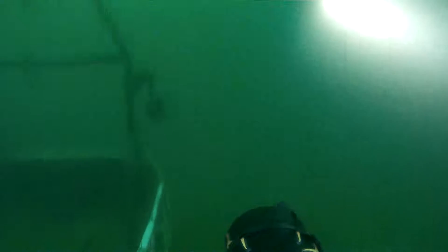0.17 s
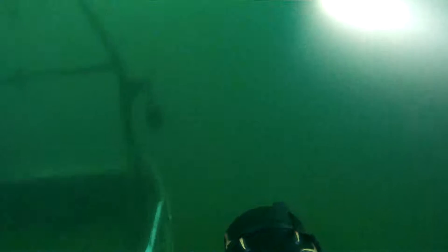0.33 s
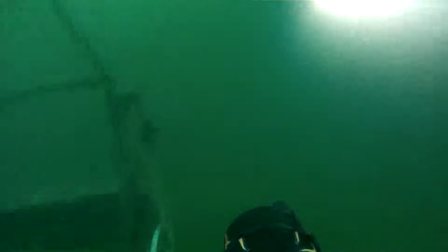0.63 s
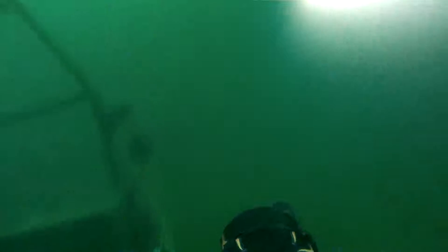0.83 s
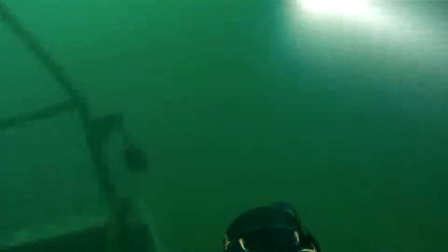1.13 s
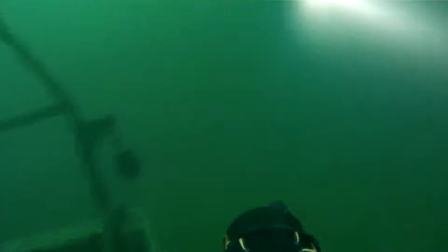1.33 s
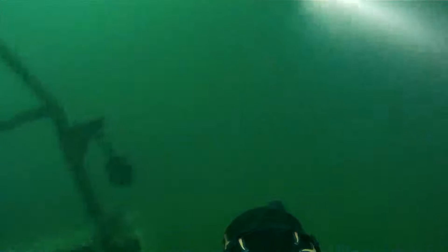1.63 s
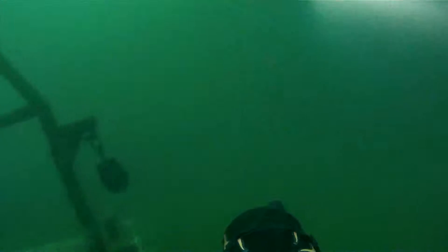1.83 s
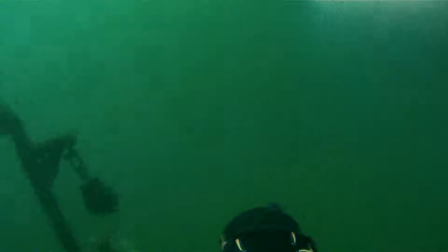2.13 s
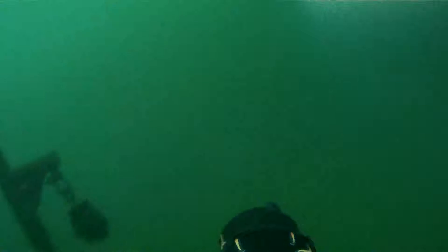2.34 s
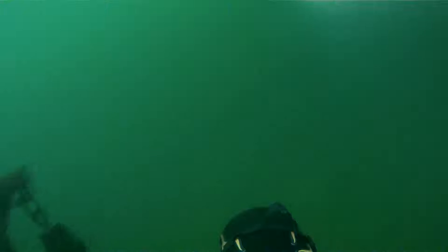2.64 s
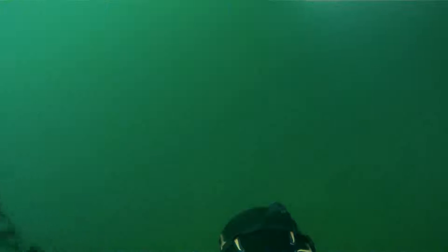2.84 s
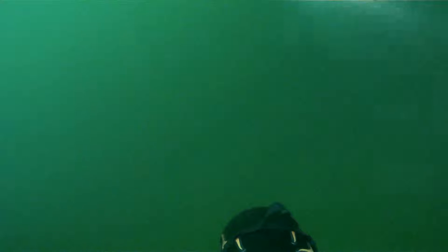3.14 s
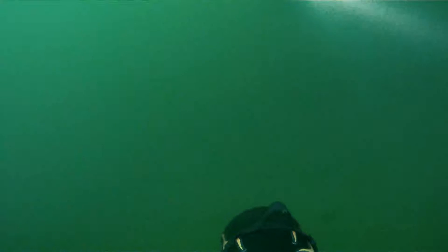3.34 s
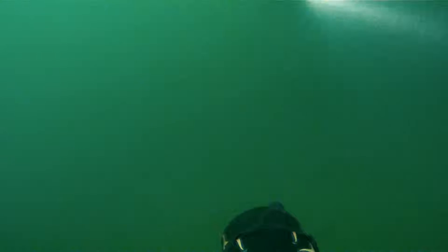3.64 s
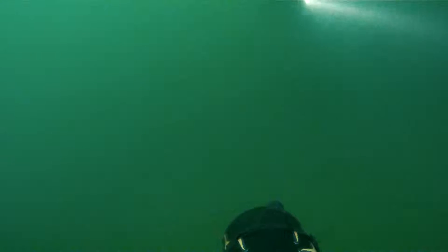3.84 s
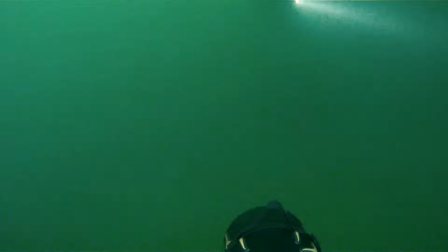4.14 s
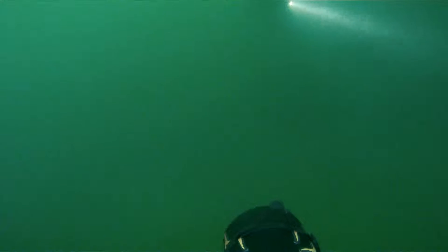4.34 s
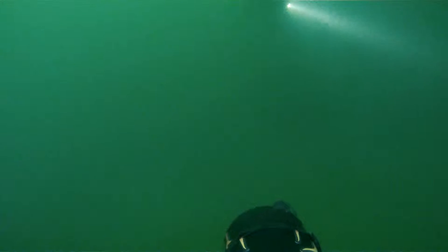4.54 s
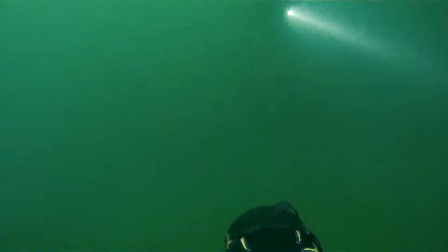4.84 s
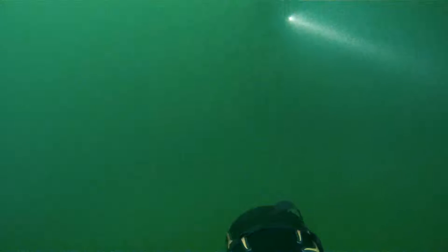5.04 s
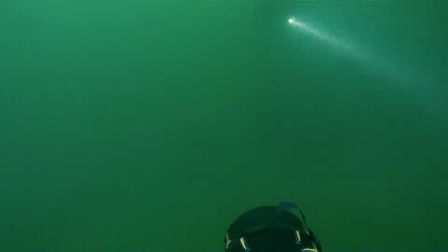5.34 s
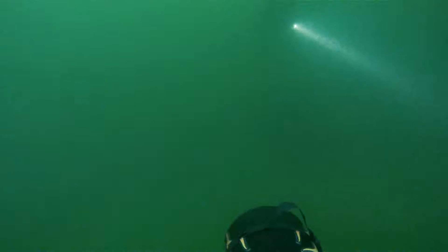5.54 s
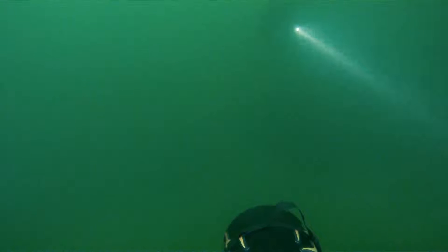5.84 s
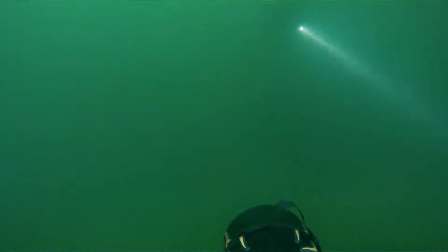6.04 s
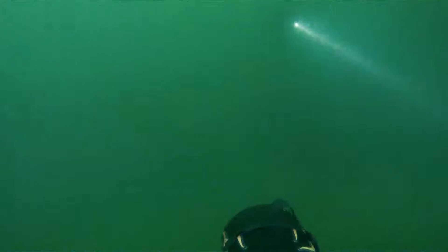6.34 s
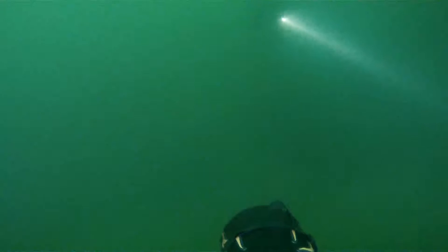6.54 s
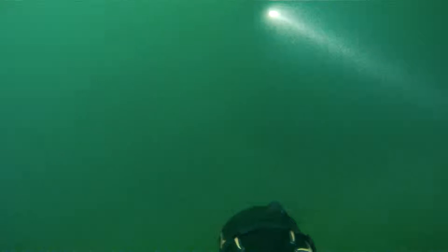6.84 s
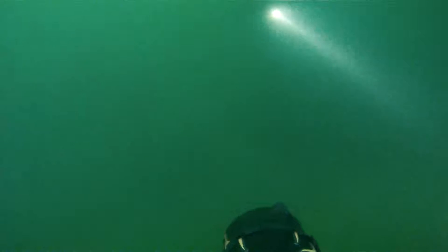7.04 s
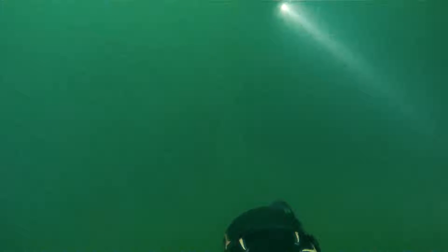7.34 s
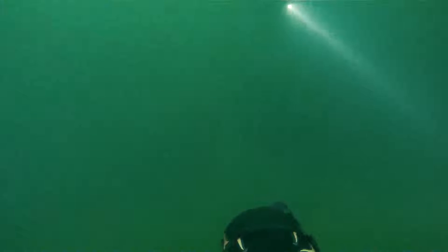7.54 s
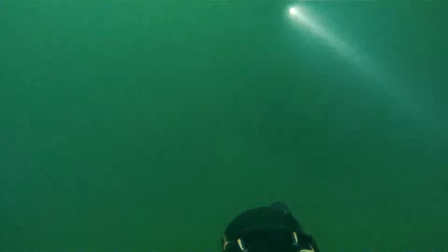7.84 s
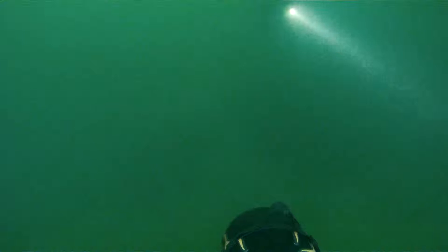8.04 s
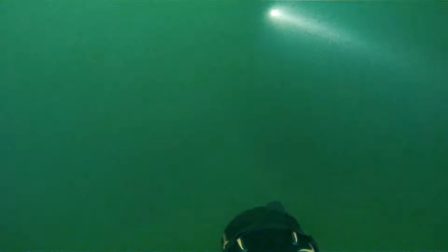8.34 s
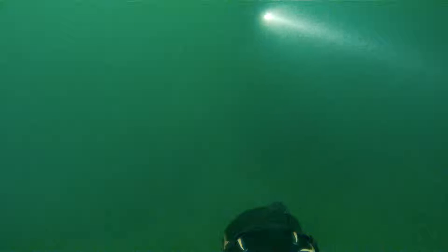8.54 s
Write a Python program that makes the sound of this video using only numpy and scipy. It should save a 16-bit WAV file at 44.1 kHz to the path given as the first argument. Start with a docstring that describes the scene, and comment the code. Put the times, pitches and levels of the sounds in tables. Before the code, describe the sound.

Heard from inside a camera housing underwater, an electric scooter hums at nearly constant speed, its low drone wavering between two close pitches. A thin steady gear whine sits on top, fading in the middle and returning. Turbulent wash rumbles with irregular soft bumps and brief gurgles. A sharp tick comes near two seconds and a hard knock near seven. The sound is close, muffled and slightly gritty.

```python
"""Under water, in a camera housing: an electric scooter tows a diver at nearly steady speed.
The propeller hums as shaft harmonics; the gearbox whines as a mesh tone with overtones and sidebands.
Filtered noise makes the wash and blade hiss; dying rings make eddies, bumps, gurgles, ticks and a knock.
The camera's limiter ticks as it steps its gain; a slow converter mirrors all into a thin treble fizz."""
import sys
import numpy as np
from scipy import signal
from scipy.fft import rfft, irfft, next_fast_len
from scipy.io import wavfile
from scipy.ndimage import minimum_filter1d

SR = 44100
rng = np.random.default_rng(int(sys.argv[2]) if len(sys.argv) > 2 else 0)


def unload_wav(signal):
    """Save mono or channel-first audio to the path in sys.argv[1] as 16-bit WAV at rate SR, clipped to [-1, 1]."""
    wavfile.write(
        sys.argv[1],
        SR,
        np.round(np.clip(np.atleast_2d(signal).T, -1, 1) * 32767).astype(np.int16),
    )


N = 383229

SHAFT_HZ, MESH_HZ = 31.8, 1408.7
CONVERTER_HZ, HOLD_COPIES, TOP_CUT_HZ = 12000, 4, 15200

# Levels are before the gains of the source functions and the recorder.
# hum lines as multiples of the shaft rate: order
HUM_ORDERS = [1, 2, 3, 4, 5, 7, 8, 9, 10, 14, 16]
# hum lines, one row per order: level_db, unsteady_share [0-1]
HUM_LINES = [(-30.5, 0.1), (-39.5, .2), (-25.5, .1), (-28, .1), (-36, 0.2), (-36.5, 0), (-25, .6),
             (-32, 0.6), (-27.5, .25), (-55, 0.9), (-43, 0.5)]
# lean between the two drones, positive favours the lower: time_s, lean_db
DRONE_LEAN = [(0, 8), (0.7, 5.5), (1.05, -8.5), (1.6, -1), (2.1, 3), (3.4, -2.5), (3.9, 1), (5.1, -8.5),
              (5.7, -5), (6.2, 4.5), (6.75, 9), (7.1, -2.5), (7.6, 7), (7.9, 0), (8.69, 3)]
# share of the lean that raises the lower drone, share that lowers the upper one
LOWER_SHARE, UPPER_SHARE = 0.85, 0.48

# gear whine at the housing, sagging in mid-passage: time_s, level_db
MESH_LEVEL = [(0, -38), (1.7, -37.5), (2.1, -39.5), (3.1, -39.5), (3.62, -35.5), (3.71, -50), (3.8, -38.5),
              (3.88, -50), (4.25, -52.5), (4.6, -44.5), (5.0, -44.0), (5.35, -38), (7.4, -35), (8.69, -39)]
# sideband offsets from the mesh tone, the shaft rocking the gears: order [shaft rates]
SIDEBAND_ORDERS = [-12, -8, -4, 4, 12, 16, 24]
# sidebands, one per offset: level_db
SIDEBAND_LEVELS = [-50.5, -58, -57.5, -52.5, -62, -60, -76]
# lower sidebands, standing out while the mesh tone sags: time_s, gain_db
LOW_SIDEBAND_GAIN = [(3.4, -1.5), (4.0, 3), (5.3, 5), (5.9, 0.5)]
# motor tones, fixed pitches with fluttering levels: pitch_hz, level_db
MOTOR_TONES = [(55.5, -24.5), (87, -33), (1070, -53), (1464, -57)]
# deepest motor tone, strongest early on: time_s, gain_db
DEEP_TONE_GAIN = [(0, -3), (1.2, 4), (2.2, .5), (8.69, -2)]
# mesh swell, about once a second
SWELL_DB, SWELL_HZ, SWELL_PEAK_S = 1.1, 0.98, 0.40
# gear overtones and, by a share, blade hiss start weaker, then hold
OVERTONE_DB, START_DB, FULL_S, HISS_SHARE = -58.8, -2.5, 1.3, 0.35

# turbulent wash spectrum: frequency_hz, density_db [dB per Hz]
WASH_SPECTRUM = [(10, -80), (22, -59.5), (42, -40.5), (75, -38.5), (105, -34.5), (145, -40), (195, -48),
                 (300, -45.5), (345, -49.5), (400, -69.5), (600, -103.5)]
# hull and shroud resonances: frequency_hz, width_hz, density_db [dB per Hz]
HULL_MODES = [(165.5, 21, -38), (253.3, 20, -40), (277.6, 29, -37.5), (313.1, 10, -45), (506, 24, -54.5),
              (564.7, 22, -58.5), (743.6, 70, -63.5), (1035.4, 36, -64), (1452, 100, -65.5)]
# eddies bumping the housing: time_s, level_db
BUMPS = [(.025, 1), (0.471, -5), (0.629, -2.5), (.842, -7), (1.329, 0), (1.874, 1), (2.211, -3), (2.46, -4),
         (3.025, -0.5), (3.475, -2), (3.655, -2), (3.874, -3), (4.19, -4), (4.633, 2.5), (5.86, -6),
         (6.111, 0), (7.227, -5), (8.039, -2.5), (8.242, -1), (8.49, 0)]
# gurgles: time_s, middle_pitch_hz, first_bubble_db, length_s
GURGLES = [(.215, 760, -21, .03), (.818, 680, -22, .035), (1.475, 720, -28, .035), (2.372, 753, -27, .02),
           (3.193, 745, -36, .02), (3.625, 630, -25, .035), (3.785, 1280, -24.5, .04),
           (5.517, 730, -14, .014), (7.70, 715, -28, .02)]
# short ticks, one faint and ringing, one sharp and broadband: time_s, pitch_hz, level_db, t60_s
TICKS = [(1.108, 2320, -38, .022), (2.142, 1800, -3.5, .0011)]
# modes of one hard knock: delay_s, pitch_hz, level_db, t60_s
KNOCK_MODES = [(0, 3020, -18, .01), (.0008, 1300, -5.5, .012), (.002, 189, 11, .028),
               (.008, 2900, -27, .009)]
KNOCK_S = 6.980
# hiss shed by the blades: frequency_hz, density_db [dB per Hz]
HISS_SPECTRUM = [(250, -83.5), (430, -67), (580, -69.5), (650, -72.5), (800, -76.5), (940, -84.5),
                 (1100, -72), (1300, -79.5), (1900, -78.5), (2250, -90.5), (2700, -94), (3150, -89.5),
                 (3550, -104), (5500, -118)]


def from_db(db):
    """Decibels to amplitude gain."""
    return np.exp(np.log(10) / 20 * np.asarray(db))


def rms_one(x):
    """Scale to unit power."""
    return x / np.sqrt(np.mean(np.abs(x) ** 2) + 1e-20)


def in_time(rows):
    """Interpolate each column to one value per sample."""
    time_s, *columns = np.transpose(rows)
    return [np.interp(np.arange(N) / SR, time_s, column) for column in columns]


def drift(rate_hz):
    """Slow random curve of spread 1: noise through two equal poles, one value per 40 samples."""
    pole = np.exp(-80 * np.pi * rate_hz / SR)
    white = rng.standard_normal(N // 40 + 2002)
    slow = signal.lfilter([1], [1, -2 * pole, pole * pole], white)[2000:]   # drop the settling
    return np.interp(np.arange(N) / 40, np.arange(len(slow)), rms_one(slow))


def noise(gain_at):
    """Noise whose amplitude per root Hz follows a function of frequency."""
    size = next_fast_len(N)
    hz = np.maximum(np.arange(size // 2 + 1) * SR / size, 1)
    spectrum = rfft(rng.standard_normal(size)) * gain_at(hz)
    return irfft(spectrum, size)[:N] * np.sqrt(SR / 2)


def slope(points):
    """Gain along straight dB lines on a log-frequency axis."""
    at_hz, db = np.transpose(points)
    return lambda hz: from_db(np.interp(np.log(hz), np.log(at_hz), db))


def resonances(modes):
    """Peaks summed in power; each amplitude halves at width / sqrt(2) off centre."""
    def gain_at(hz):
        power = 0
        for at_hz, width_hz, db in modes:
            offset = (hz - at_hz) / width_hz * np.sqrt(2)
            power = power + (from_db(db) / (1 + offset ** 2)) ** 2
        return np.sqrt(power)
    return gain_at


def tone(turns, rms_db):
    """Sine of given rms level and random starting phase."""
    return np.sqrt(2) * from_db(rms_db) * np.sin(2 * np.pi * (turns + rng.random()))


def add_ring(out, start_s, hz, db, t60_s, rise_s):
    """Add one sine with exponential rise and decay, at most 0.2 s long."""
    start = round(start_s * SR)
    t = np.arange(min(SR // 5, N - start)) / SR
    decay = np.exp(-np.log(1000) * t / t60_s)
    rise = 1 - np.exp(-t / rise_s)
    out[start:start + len(t)] += from_db(db) * np.sin(2 * np.pi * hz * t) * decay * rise


def build_up_db():
    """Level that climbs at the start, then stays at 0 dB."""
    return START_DB * np.maximum(1 - np.arange(N) / SR / FULL_S, 0)


def propeller(clock_s, lower_db, upper_db, flutter_hz=6.0):
    """Shaft harmonics; uneven inflow makes part of each line wander in strength and phase."""
    out = np.zeros(N)
    drone_db = {8: lower_db, 9: upper_db, 10: upper_db}
    for order, (db, unsteady) in zip(HUM_ORDERS, HUM_LINES):
        wander = drift(flutter_hz) + 1j * drift(flutter_hz)
        load = np.sqrt(1 - unsteady) + np.sqrt(unsteady / 2) * wander
        turns = order * SHAFT_HZ * clock_s + rng.random()
        line = np.real(load * np.exp(2j * np.pi * turns))
        out += np.sqrt(2) * from_db(db + drone_db.get(order, 0)) * line
    return out


def gear_mesh(clock_s, mesh_db=3.0, flutter_db=1.32, flutter_hz=30):
    """Tooth-contact tone, swelling regularly and fluttering at random."""
    whine_db, = in_time(MESH_LEVEL)
    swell_db = SWELL_DB * np.cos(2 * np.pi * SWELL_HZ * (clock_s - SWELL_PEAK_S))
    return tone(MESH_HZ * clock_s, whine_db + mesh_db + swell_db + flutter_db * drift(flutter_hz))


def gear_overtones(clock_s, second_db=6.0, third_db=-14.5, waver_db=0.7, waver_hz=4.2):
    """Second and third mesh harmonics sharing one wavering level."""
    level_db = OVERTONE_DB + build_up_db() + waver_db * drift(waver_hz)
    second = tone(2 * MESH_HZ * clock_s, level_db + second_db)
    third = tone(3 * MESH_HZ * clock_s, level_db + third_db)
    return second + third


def gear_sidebands(clock_s, flutter_db=3.0, flutter_hz=4.9, phase_turns=0.096, phase_hz=5.8):
    """The rocking shaft puts tones at whole shaft rates from the mesh tone."""
    low_gain_db, = in_time(LOW_SIDEBAND_GAIN)
    out = np.zeros(N)
    for order, db in zip(SIDEBAND_ORDERS, SIDEBAND_LEVELS):
        turns = (MESH_HZ + order * SHAFT_HZ) * clock_s + phase_turns * drift(phase_hz)
        out += tone(turns, db + low_gain_db * (order < 0) + flutter_db * drift(flutter_hz))
    return out


def motor(clock_s, flutter_db=1.5, flutter_hz=2.7, throb_db=2.5, throb_hz=2.8):
    """Motor tones with fluttering levels; the deepest also throbs at random."""
    deep_db, = in_time(DEEP_TONE_GAIN)
    deep_db = deep_db + throb_db * drift(throb_hz)
    out = np.zeros(N)
    for k, (hz, db) in enumerate(MOTOR_TONES):
        out += tone(hz * clock_s, db + deep_db * (k == 0) + flutter_db * drift(flutter_hz))
    return out


def gearbox(clock_s):
    """Mesh tone, overtones, sidebands and motor tones on one shaft clock."""
    return gear_mesh(clock_s) + gear_overtones(clock_s) + gear_sidebands(clock_s) + motor(clock_s)


def eddies(per_s=13, middle_hz=140, pitch_spread=0.28, level_db=-4.5, spread_db=2.5, t60_s=0.04):
    """Small eddies shed one after another, each a soft low lump; per_s is nominal."""
    out = np.zeros(N)
    draws = rng.standard_normal((400, 3))
    times_s = np.cumsum(np.exp(0.5 * draws[:, 0])) / per_s
    for start_s, (_, pitch, size) in zip(times_s, np.clip(draws, -2, 2)):
        if start_s < N / SR:
            hz = middle_hz * np.exp(pitch_spread * pitch)
            add_ring(out, start_s, hz, level_db + spread_db * size, t60_s, rise_s=0.0033)
    return out


def wash(gain_db=-3.0, lump_db=2.5, lump_hz=22):
    """Turbulent rumble, its level lumpy at random, plus small eddies."""
    return noise(slope(WASH_SPECTRUM)) * from_db(gain_db + lump_db * drift(lump_hz)) + eddies()


def bumps(hz=145, gain_db=11, t60_s=0.02, rise_s=0.0018, lead_s=0.004, soft_hz=260):
    """Large eddies hit the housing: low rings, low-passed to a dull, cushioned push."""
    out = np.zeros(N)
    for time_s, db in BUMPS:
        add_ring(out, time_s - lead_s, hz, db + gain_db, t60_s, rise_s)
    lowpass = signal.butter(4, soft_hz, fs=SR, output="sos")
    return signal.sosfilt(lowpass, out + 1e-18)   # offset avoids denormals


def gurgles(t60_s=0.019, size_spread=0.15, fade_db=1.2, count=6):
    """Bursts of bubbles; unequal size spreads the pitch, each a little weaker than the last."""
    out = np.zeros(N)
    for time_s, middle_hz, db, length_s in GURGLES:
        for k, size in enumerate(rng.standard_normal(count)):
            hz = middle_hz * np.exp(size_spread * size)
            add_ring(out, time_s + length_s * k / count, hz, db - fade_db * k, t60_s, rise_s=0.0012)
    return out


def ticks_and_knock(rise_cycles=0.55):
    """Short dying rings; low modes take longer to start."""
    out = np.zeros(N)
    for time_s, hz, db, t60_s in TICKS:
        add_ring(out, time_s, hz, db, t60_s, rise_s=rise_cycles / hz)
    for delay_s, hz, db, t60_s in KNOCK_MODES:
        add_ring(out, KNOCK_S + delay_s, hz, db, t60_s, rise_s=rise_cycles / hz)
    return out


def hull_hum(lower_db, upper_db):
    """Noise through the low hull modes, following the mean of the drone levels."""
    low_modes = [mode for mode in HULL_MODES if mode[0] <= 400]
    return noise(resonances(low_modes)) * from_db((lower_db + upper_db) / 2)


def blade_hiss(clock_s, gain_db=0.1, throb_rms_db=1.5, patchy_db=1.5, patchy_hz=20):
    """Hiss and upper hull ringing, swelling four times per shaft turn."""
    upper_modes = [mode for mode in HULL_MODES if mode[0] > 400]
    hiss = noise(slope(HISS_SPECTRUM)) + noise(resonances(upper_modes))
    throb_db = throb_rms_db * tone(4 * SHAFT_HZ * clock_s, 0)
    level_db = gain_db + HISS_SHARE * build_up_db()
    return hiss * from_db(level_db + throb_db + patchy_db * drift(patchy_hz))


def scene(drone_gain_db=2.0):
    """Rotating parts share one slightly wavering speed; as one drone swells the other gives way."""
    lean_db, = in_time(DRONE_LEAN)
    lower_db, upper_db = LOWER_SHARE * lean_db, -UPPER_SHARE * lean_db
    clock_s = np.cumsum(1 + 0.00042 * drift(2.18)) / SR
    out = from_db(drone_gain_db) * propeller(clock_s, lower_db, upper_db)
    out += gearbox(clock_s)
    out += wash() + bumps() + gurgles() + ticks_and_knock()
    out += hull_hum(lower_db, upper_db) + blade_hiss(clock_s)
    return out[None]


def limiter(x, drive_db=0.45, ceiling_db=-6.5, share=0.91, hold_s=0.035, release_db_per_s=42,
            attack_s=0.0022, step_db=0.23):
    """Peaks push the gain down, it waits and creeps back up; it moves in steps, and each step ticks."""
    x = x * from_db(drive_db)
    over_db = share * np.maximum(20 * np.log10(np.abs(x) + 1e-9) - ceiling_db, 0)
    half = int(hold_s * SR / 2)
    over_db = -minimum_filter1d(-over_db, 2 * half + 1, origin=half)   # highest peak of the last hold_s
    recovery_db = release_db_per_s * np.arange(N) / SR
    held_db = np.maximum.accumulate(over_db + recovery_db) - recovery_db
    pole = np.exp(-1 / (attack_s * SR))
    cut_db = signal.lfilter([1 - pole], [1, -pole], held_db)
    return x * from_db(-step_db * np.round(cut_db / step_db))


def record(dry):
    """Bass cut, limiter, low-pass, then a slow converter whose held steps mirror sound; top cut."""
    bass_cut = signal.butter(2, 20, "high", fs=SR, output="sos")
    x = limiter(signal.sosfilt(bass_cut, dry[0]))
    x = signal.sosfilt(signal.butter(10, 5400, fs=SR, output="sos"), x)
    slow = signal.resample_poly(x, CONVERTER_HZ, SR)
    steps = np.repeat(slow, HOLD_COPIES)
    held = signal.resample_poly(steps, SR, CONVERTER_HZ * HOLD_COPIES)[:N]
    top_cut = signal.ellip(10, 0.3, 80, TOP_CUT_HZ, fs=SR, output="sos")
    return signal.sosfilt(top_cut, held)[None]


dry = scene()
out = record(dry)
unload_wav(out)
```